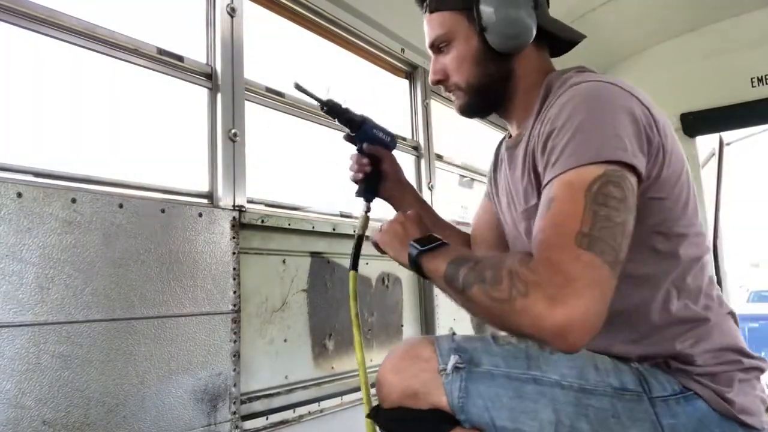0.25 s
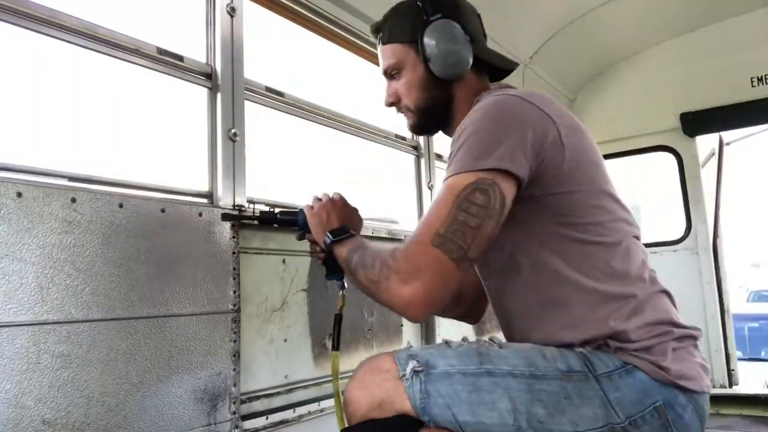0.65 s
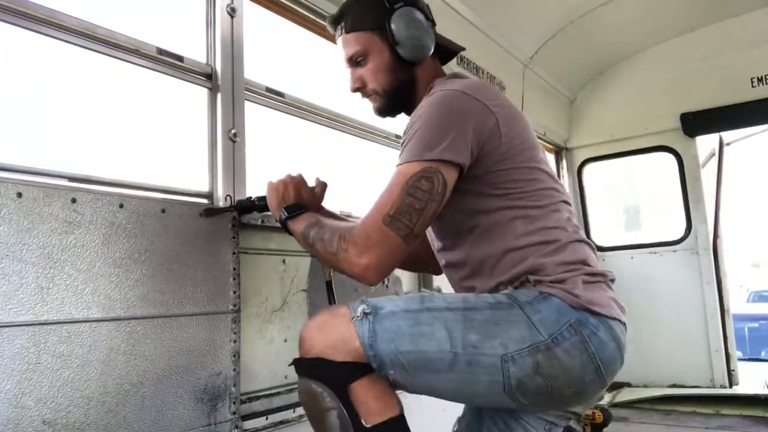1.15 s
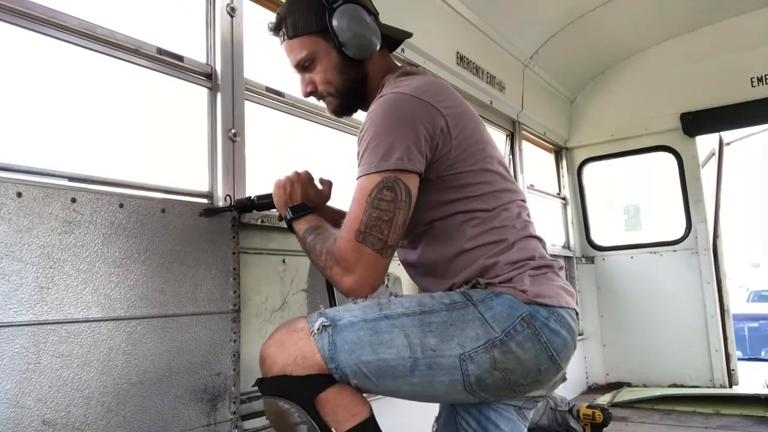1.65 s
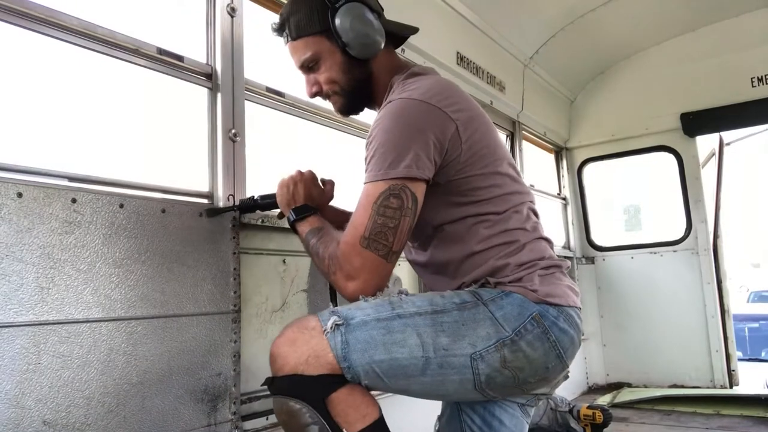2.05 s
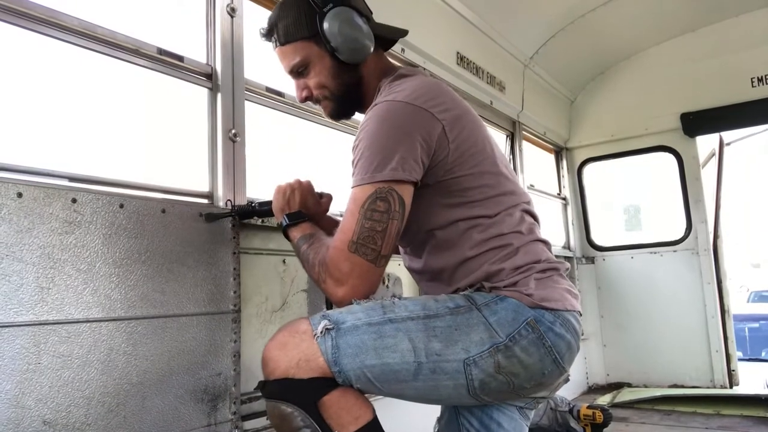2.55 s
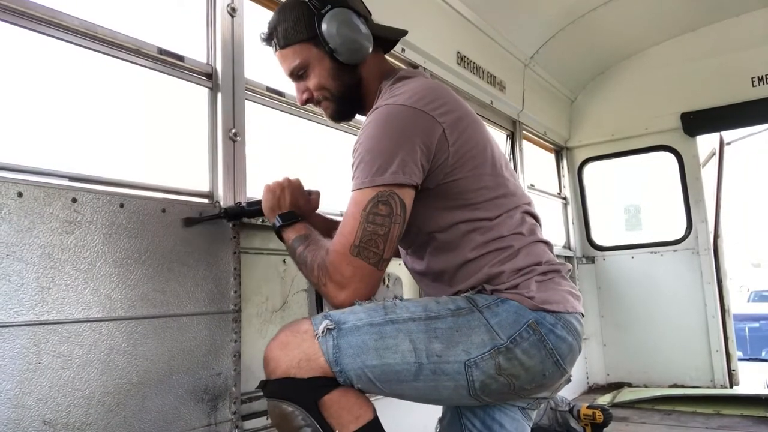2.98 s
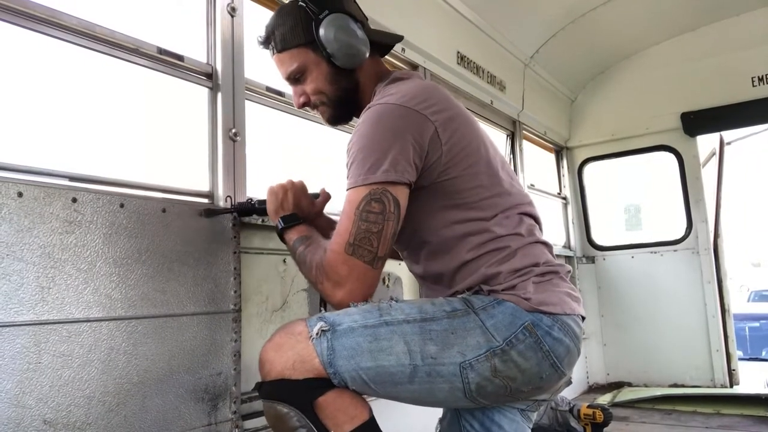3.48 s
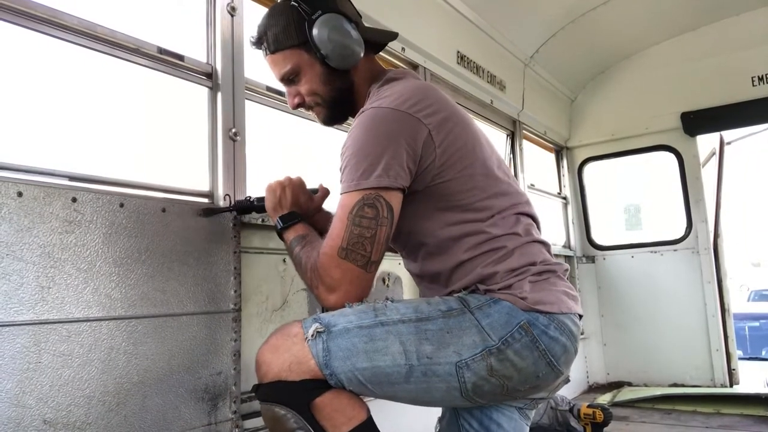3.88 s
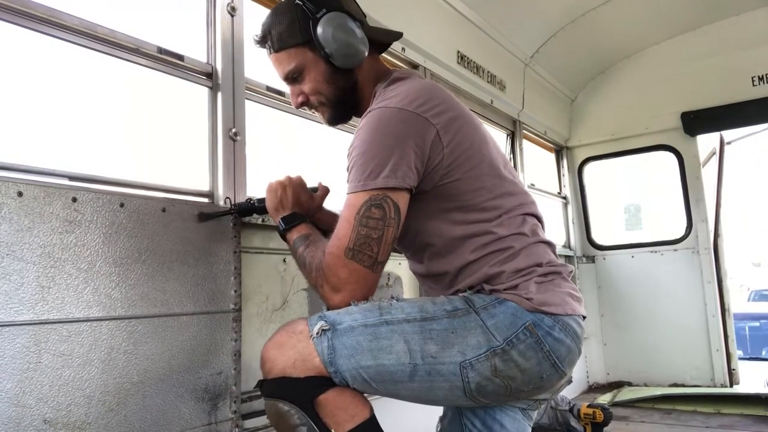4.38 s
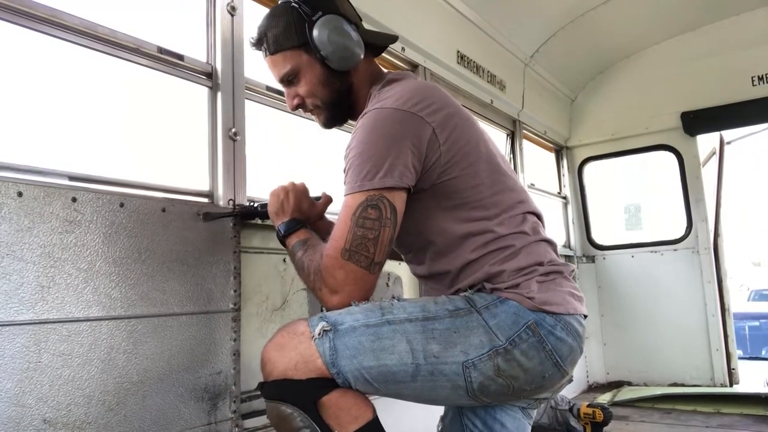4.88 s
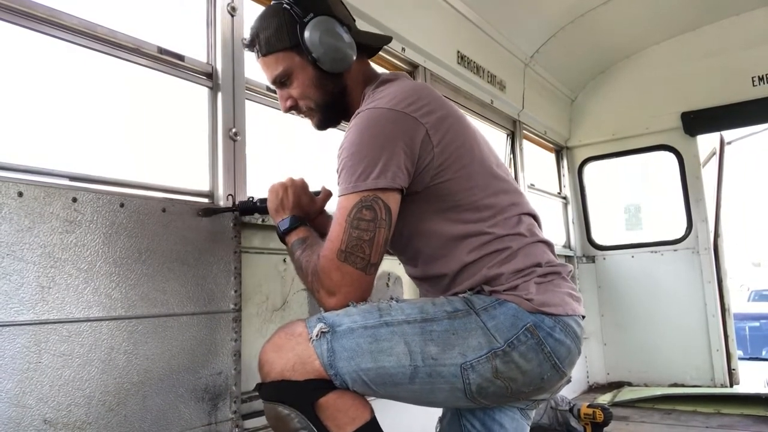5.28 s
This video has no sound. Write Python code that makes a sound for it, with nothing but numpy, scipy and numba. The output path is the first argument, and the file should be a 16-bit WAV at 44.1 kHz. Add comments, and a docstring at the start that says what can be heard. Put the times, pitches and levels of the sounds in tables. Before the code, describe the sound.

A quiet, low room tone fills a bare sheet-steel bus. For the first 1.8 seconds a tool and hose are handled: soft bumps, a hollow knock near 0.55, a cluster of sharper clacks with a thin metallic ring around 0.9, more knocks at 1.1 to 1.2, then faint rustle, ticks and barely audible thin whistles. At about 1.85 air pops and hisses and a pneumatic hammer rattles until 2.1, around fifty cracking, thudding blows per second. The cabin echo decays, with a faint knock at 2.3. A second burst runs 2.9 to 3.1; light knocks and rustle follow at 3.2 to 3.7. Louder bursts come at 3.75 to 3.95, 4.2 to 4.4 and 4.8 to 5.1, with stray blows at their edges. A single hard blow lands at 5.5 and dies away. Wall metal rings under a dense, short echo; the phone microphone flattens the peaks.

```python
"""In an empty sheet-steel bus, tool and hose first knock, tick and rustle amid thin whistles and room tone.
Near 0.9 s the chisel shank rings thinly with the knocks. Then an air hammer is triggered six times on rivets:
air hisses in and each blow cracks and thuds as shaped noise. The wall sheet rings on in decaying sines, the
bare cabin in noise tails; knocks and rustle fill two of the gaps. The sixth pull gives a single blow, and the
cabin dies away. A phone turns the loud moments down and rounds them.
"""
import sys
import numpy as np
from scipy import signal
from scipy.fft import rfft, irfft
from scipy.io import wavfile
from scipy.ndimage import uniform_filter1d
from numba import njit

SR = 44100
rng = np.random.default_rng(int(sys.argv[2]) if len(sys.argv) > 2 else 0)


def store_wav(level_fs):
    """Save 16-bit WAV to argv[1]."""
    pcm = np.round(np.clip(np.atleast_2d(level_fs), -1, 1) * 32767)
    wavfile.write(sys.argv[1], SR, pcm.T.astype(np.int16))


def invert_db(level):
    """Linear amplitude ratio for a level in decibels (20 dB per decade), elementwise."""
    return 10 ** (np.asarray(level, dtype=float) / 20)


N = 243873
T = np.arange(N) / SR

# trigger pulls: pull t/s, release t/s, air level/dB, crack level/dB at the pull, thud against crack level/dB
TRIGGER_PULLS = [(1.844, 2.045, -19.5, -14.5, -5), (2.89, 3.046, -37, -11, -7),
                 (3.742, 3.944, -26.5, -6, -6.5), (4.189, 4.39, -33, -7, -6),
                 (4.782, 5.053, -26, -6.5, -6.5), (5.489, 5.59, -27, -4, -3.5)]
# piston running steadily: first blow t/s, last blow t/s, blow rate f/Hz
PISTON_RUNS = [(1.9016, 2.0754, 52), (2.9352, 3.0954, 50), (3.7655, 3.9594, 46.7), (4.2073, 4.3804, 46.2),
               (4.8299, 5.0434, 46.8), (5.5109, 5.5109, 47)]
# single sounds around the runs, air pops at the pull and lone blows of the piston: t/s, crack level/dB
LONE_HITS = [(1.8516, -16), (1.8646, -5.5), (1.8781, -14), (2.8994, -12), (2.914, -16.5), (4.413, -19),
             (4.811, -9.5), (5.0793, -15)]
# spectrum of steel cracking on steel: f/Hz, level/dB (per Hz, relative)
CRACK_SPECTRUM = [(710, -14), (1200, -5), (1410, -6.5), (1570, -5), (2030, -6.5), (3260, -2), (3960, -5),
                  (4610, -6), (5960, -9.5), (9170, -8), (11000, -13), (14400, -9), (15700, -12.5)]
# spectrum of the blow thudding into the sheet: f/Hz, level/dB (per Hz, relative)
THUD_SPECTRUM = [(15, -53.5), (25, -43.5), (103, -3), (135, -9.5), (210, -1), (271, -3), (338, -2.5),
                 (445, 4), (642, -2.5), (876, -3.5), (2000, -25), (2600, -27), (4400, -120)]
# spectrum of the valve hiss: f/Hz, level/dB (per Hz, relative)
AIR_SPECTRUM = [(880, -40), (1500, -14.5), (2900, -9), (3600, -12), (4510, -20), (7740, -8), (15700, -20)]
# ringing modes of the wall sheet: f/Hz, level/dB (relative), t60 t/s
PANEL_MODES = [(139, -3, 1.1), (165, -6, 1.), (229, -8, .9), (295, -7, .9), (361, -6, 1.1), (450, 0, .4),
               (550, 0, .4), (685, -2, .4), (1215, -34, 2.2), (1563, -33, 2.4), (1590, -29, 2.6),
               (1631, -32, 2.2)]
# how long the cabin rings in each octave: f/Hz, t60 t/s
CABIN_DECAY = [(60, 0.48), (125, 0.41), (250, 0.37), (500, 0.3), (1000, 0.34), (2000, 0.31), (4000, 0.3),
               (8000, 0.29), (14000, 0.13)]
# tool and hose knocking: t/s, level/dB, hardness (0 soft bump, 0.5 hollow knock, 1 clack)
KNOCK_HITS = [(0.0748, -48.5, 0), (0.39, -44, 0), (0.5415, -31.5, 0.28), (0.5681, -45.5, 0),
              (0.8296, -48, 0.74), (0.8901, -21.5, 0.78), (0.9137, -31.5, 0.49), (0.9435, -26.5, 0.76),
              (0.967, -31, 0.28), (1.1229, -25.5, 0.76), (1.1491, -27.5, .15), (1.2099, -34, 0.3),
              (2.3002, -42, 0.3), (3.2706, -37, 0.18), (3.329, -37.5, 0.17), (3.4503, -40, 0.71),
              (3.6823, -47.5, 0.48)]
# thin ticks, most of them the bright edge of a knock: t/s, level/dB
TICK_HITS = [(0.3426, -55), (0.7261, -58.5), (0.8893, -46), (0.9134, -39.5), (0.9435, -38.5),
             (0.968, -39.5), (1.1225, -49), (1.6291, -51), (1.707, -44.5), (3.2705, -44)]
# hose and cloth dragging: start t/s, length t/s, rustle level/dB, rumble level/dB
DRAG_MOVES = [(0, 0.017, -56.5, -52.5), (0.099, 0.21, -73, -52), (0.176, 0.045, -45, -61),
              (0.29, 0.23, -71, -61.5), (0.583, 0.042, -65, -44.5), (0.697, 0.022, -62, -53),
              (0.816, 0.015, -81, -52), (1.164, 0.018, -42.5, -31), (1.285, 0.028, -66, -53),
              (1.394, 0.11, -73, -67.5), (1.511, 0.12, -54, -60.5), (1.67, .15, -64, -62),
              (3.188, 0.12, -48, -59), (3.42, 0.18, -78, -54)]
# spectrum of the rustle: f/Hz, level/dB (per Hz, relative)
RUSTLE_SPECTRUM = [(410, -21), (700, -10), (1080, -11.5), (1190, -16), (1340, -11), (1720, -11),
                   (2030, -11), (6920, -17.5), (15700, -31.5)]
# thin whistles, and the chisel shank's thin ring during the knocks near 0.9 s:
# start t/s, end t/s, centre f/Hz, width f/Hz (a third of the way to -40 dB), level/dB
THIN_BANDS = [(0, .18, 6450, 70, -72), (.27, .42, 7900, 60, -75), (.65, .89, 3600, 60, -71),
              (.9, 1.08, 7850, 250, -62), (.935, .975, 3550, 90, -52), (1.41, 1.56, 3430, 70, -77),
              (1.42, 1.56, 2520, 90, -79), (3.45, 3.6, 1510, 60, -66)]
# spectrum of the room tone: f/Hz, level/dB (per Hz, relative)
ROOM_SPECTRUM = [(15, -46), (25, -16), (150, -2), (190, -10), (335, -6), (430, -18), (1100, -21),
                 (1600, -21), (1800, -25), (2800, -23), (16000, -50)]

STROKE_JITTER_S = .0012
# blows weaken as line pressure sags, and fast once the trigger is let go
SAG_DB_PER_S, COAST_DB_PER_S = 12.5, 207
SEATING_DB = -1  # run blows just after the pull, before the hand bears down
FOCUS_DB = 65  # loss of a layer one whole step of hardness away
DRAG_RISE_S, DRAG_FALL_S = 0.056, 0.047
ROOM_DB = -69
TOP_HZ = 15850


def colour(x, points):
    """Give white input the spectrum of (Hz, dB) points at unchanged power."""
    hz, db = np.transpose(points)
    bin_hz = np.arange(len(x) // 2 + 1) * SR / len(x)
    gain = invert_db(np.interp(np.log(bin_hz + 1), np.log(hz), db))
    return irfft(rfft(x) * gain / np.sqrt(np.mean(gain ** 2)), len(x))


def coloured(points, size=N):
    """Noise of rms 1 with that spectrum."""
    return colour(rng.standard_normal(size), points)


def band(lo_hz, hi_hz, edge_db=-40):
    """Spectrum points: flat between two edges that slope to edge_db an octave out and on to three times that."""
    below = [(lo_hz / 8, 3 * edge_db), (lo_hz / 2, edge_db), (lo_hz, 0)]
    above = [(hi_hz, 0), (hi_hz * 2, edge_db), (hi_hz * 8, 3 * edge_db)]
    return below + above


def hits(times, db, rise_s, fall_s, points):
    """Rows: each hit as a dying noise burst up close; its energy as one clean impulse for panel and cabin."""
    spikes = np.zeros(N)
    np.add.at(spikes, (np.asarray(times) * SR).astype(int), invert_db(np.asarray(db)))
    t = T[:SR // 4]
    shape = (1 - np.exp(-t / rise_s)) * np.exp(-t / fall_s)
    shape = shape / shape.max()
    burst = signal.fftconvolve(spikes, shape)[:N] * coloured(points)
    impulse = np.sqrt(np.sum(shape ** 2)) * colour(spikes, points)
    return np.array([burst, impulse])


def gate(on_s, off_s, rise_s, fall_s):
    """Envelope: a squared ramp in from on_s, an exponential fade from off_s."""
    rise = np.clip((T - on_s) / rise_s, 0, 1) ** 2
    return rise * np.exp(-np.maximum(T - off_s, 0) / fall_s)


def flicker(rate, db):
    """Gain that wanders smoothly around 0 dB, drawn anew rate times a second."""
    k = int(SR / rate)
    steps = np.repeat(rng.standard_normal(N // k + 1), k)
    return invert_db(db * uniform_filter1d(steps, k)[:N])


def hammer():
    """Steel on steel: a short bright crack, a longer thud; the valve pops and hisses as the trigger is held."""
    pull, release, air_db, crack_db, thud_db = np.transpose(TRIGGER_PULLS)
    lone_s, lone_db = np.transpose(LONE_HITS)
    run = np.concatenate([np.linspace(first, last, round((last - first) * rate) + 1)
                          for first, last, rate in PISTON_RUNS])
    chance = rng.standard_normal((3, len(run) + len(lone_s)))
    # the stroke wanders, except on the first blow of a run
    follows_on = np.diff(run, prepend=0) < .1
    run = run + STROKE_JITTER_S * chance[2, :len(run)] * follows_on

    k = np.searchsorted(pull, run) - 1
    since_pull = run - pull[k]
    since_release = np.maximum(run - release[k], 0)
    run_db = crack_db[k] - SAG_DB_PER_S * since_pull - COAST_DB_PER_S * since_release
    run_db = run_db + SEATING_DB * (since_pull < .03)

    s, db = np.append(run, lone_s), np.append(run_db, lone_db)
    burst = np.searchsorted(pull, s) - 1
    # a sound this soon after the pull is a bright pop of air with hardly any thud
    pop_thud_db = np.where(s - pull[burst] < .012, -15, 0)
    # the chisel bites differently each time: some blows are brighter, some fuller
    bite_db = 2 * chance
    crack = hits(s, db + bite_db[0], .0018, .0042, CRACK_SPECTRUM)
    thud = hits(s, db + thud_db[burst] + pop_thud_db + bite_db[1], .002, .006, THUD_SPECTRUM)

    # air rushes in at the pull, then thins to a steady hiss
    held = 0
    for on, off, level_db in zip(pull, release, air_db):
        rush = gate(on, on + .02, .009, .006)
        steady = .2 * gate(on, off, .009, .02)
        held = held + invert_db(level_db) * (rush + steady)
    air = held * flicker(90, 3) * coloured(AIR_SPECTRUM)
    # the hiss joins both rows, so it also drives panel and cabin
    return crack + thud + air


def panel(push):
    """The wall sheet rings in its modes after every push, each a sine with its own decay."""
    hz, db, t60 = (column[:, None] for column in np.transpose(PANEL_MODES))
    t = T[:2 * SR]
    modes = invert_db(db) * np.sin(2 * np.pi * hz * t) * np.exp(-np.log(1000) * t / t60)
    ring = np.sum(modes, axis=0)
    return signal.fftconvolve(push, ring / np.sqrt(np.sum(ring ** 2)))[:N]


def cabin(x):
    """Dense echo of a bare steel box: octaves of noise swell in and die at their own rates, the far end later."""
    t = T[:2 * SR]
    tail = 0
    for hz, t60 in CABIN_DECAY:
        near = np.exp(-np.log(1000) * t / t60)
        far = invert_db(-25.0 - 11 * (hz > 6000)) * np.exp(-np.log(1000) * t / (3 * t60))
        octave = coloured(band(hz / 1.353, hz * 1.313), size=len(t))
        tail = tail + np.sqrt(hz / t60) * (near + far) * octave
    tail = tail * (1 - np.exp(-t / .014))
    return signal.fftconvolve(x, tail / np.sqrt(np.sum(tail ** 2)))[:N]


def knocks():
    """Thin bright ticks; and knocks that lean to a clack, a hollow knock or a bump by their hardness."""
    s, db, hard = np.transpose(KNOCK_HITS)
    tick_s, tick_db = np.transpose(TICK_HITS)
    ticks = hits(tick_s, tick_db, .0008, .004, band(5000, 15000, -8.5))
    clack = hits(s, db - FOCUS_DB * (hard - 1) ** 2, 0.00038, 0.0023, band(2600, 3200, -14))
    hollow = hits(s, db - FOCUS_DB * (hard - .5) ** 2, .0008, .006, band(480, 1250, -24))
    bump = hits(s, db - FOCUS_DB * hard ** 2, .002, 0.0098, band(130, 340, -13.5))
    return ticks + clack + hollow + bump


def drag():
    """Friction of hose and cloth: grainy rustle and low rumble, each noise under swelling envelopes."""
    rustle, rumble = 0, 0
    for on, length, rustle_db, rumble_db in DRAG_MOVES:
        move = gate(on, on + length, DRAG_RISE_S, DRAG_FALL_S)
        rustle = rustle + invert_db(rustle_db) * move
        rumble = rumble + invert_db(rumble_db) * move
    grainy = rustle * flicker(83, 1.9) * coloured(RUSTLE_SPECTRUM)
    low = rumble * flicker(15, 1) * coloured(band(100, 650, -17.5))
    return grainy + low


def whistles_and_shank():
    """Thin whistles and the chisel shank's thin ring near 0.9 s: narrow bands of noise, wavering together."""
    thin = 0
    for on, off, hz, width, db in THIN_BANDS:
        peak = [(hz - 3 * width, -40), (hz, 0), (hz + 3 * width, -40)]
        thin = thin + invert_db(db) * gate(on, off, 0.0083, 0.015) * coloured(peak)
    return flicker(40, 3) * thin


def room_tone():
    """Steady low-heavy noise under everything, its level drifting slightly."""
    return invert_db(ROOM_DB) * flicker(6, 1.5) * coloured(ROOM_SPECTRUM)


def scene():
    """All hits push the panel and fill the cabin; drag, thin tones and room tone lie beneath."""
    blows, blow_impulse = hammer()
    taps, tap_impulse = knocks()
    close = blows + taps + invert_db(-17) * tap_impulse
    ring = invert_db(-22.0) * panel(blow_impulse + tap_impulse)
    # the send turns between two different echoes, so the tail of regular blows stays uneven
    sent = .6 * blow_impulse + blows + tap_impulse
    turn = 2 * np.pi * 5.7 * T
    echo = invert_db(-1.5) * (cabin(sent * np.cos(turn)) + cabin(sent * np.sin(turn)))
    return (close + echo + ring + drag() + whistles_and_shank() + room_tone())[None]


@njit
def follow(x, attack, release):
    """Level that rises fast and falls slowly."""
    e, y = 0., np.empty(len(x))
    for i in range(len(x)):
        e += (x[i] - e) * (attack if x[i] > e else release)
        y[i] = e
    return y


def low_pass(x):
    """Removes everything above the highest recorded frequency."""
    return signal.sosfilt(signal.butter(12, 17000, fs=SR, output="sos"), x)


def record(dry):
    """The phone turns loud sound down a moment ahead, thins the bass, rounds the peaks and cuts the top."""
    level = follow(np.abs(dry[0]), 1 / (0.0027 * SR), 1 / (.10 * SR))  # 2.7 ms up, 100 ms down
    look = SR // 250  # 4 ms ahead
    ahead = np.append(level[look:], level[-look:])
    gain = (invert_db(-33) / np.maximum(ahead, invert_db(-35.5))) ** 0.29
    bass_cut = signal.butter(1, 60., "high", fs=SR, output="sos")
    rounded = np.tanh(2 * gain * signal.sosfilt(bass_cut, dry))
    top_cut = signal.ellip(10, .3, 60, TOP_HZ, fs=SR, output="sos")
    mix = signal.sosfilt(top_cut, rounded)
    return low_pass(mix)


dry = scene()
out = record(dry)
store_wav(out)
```